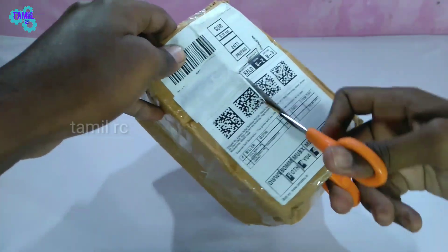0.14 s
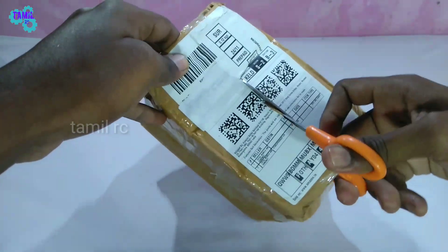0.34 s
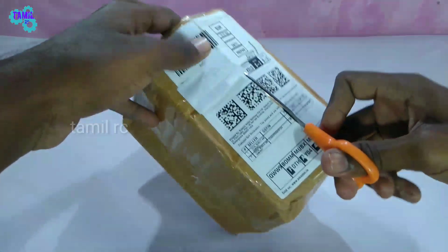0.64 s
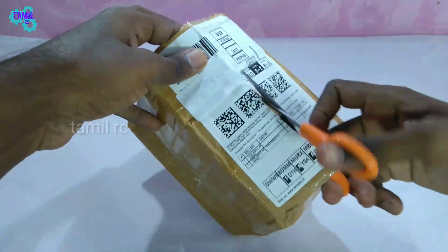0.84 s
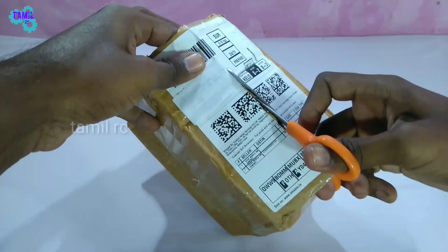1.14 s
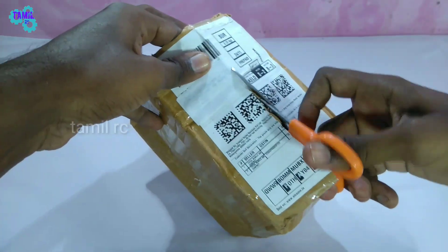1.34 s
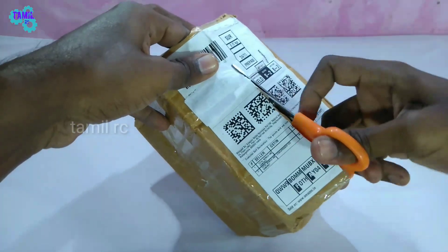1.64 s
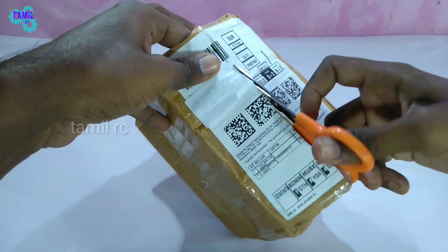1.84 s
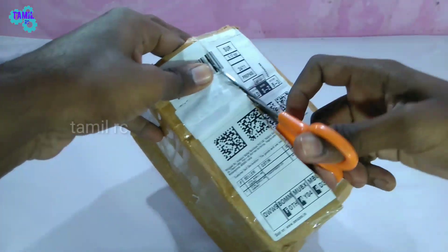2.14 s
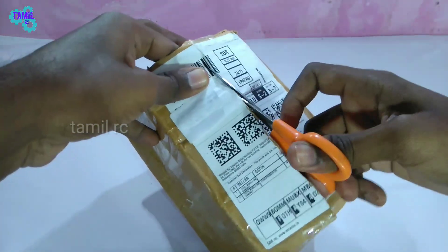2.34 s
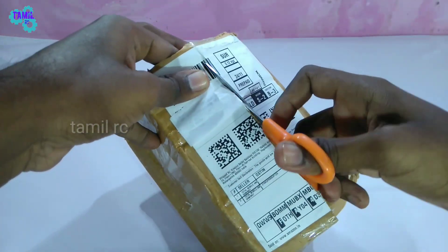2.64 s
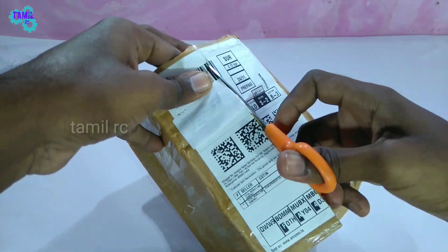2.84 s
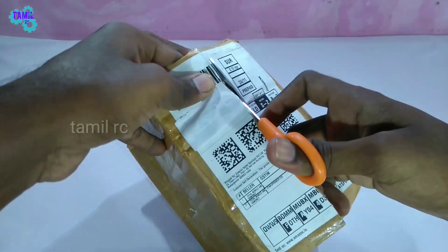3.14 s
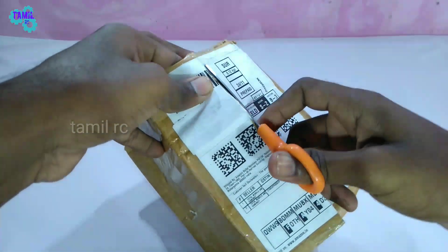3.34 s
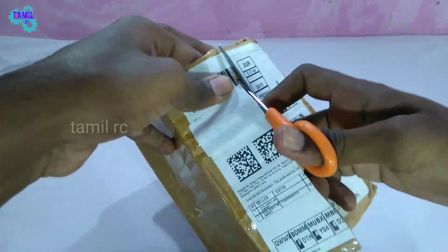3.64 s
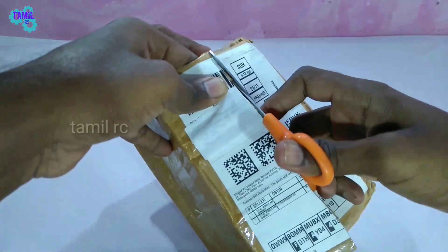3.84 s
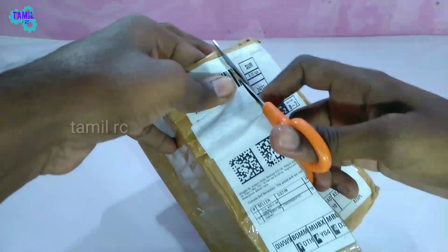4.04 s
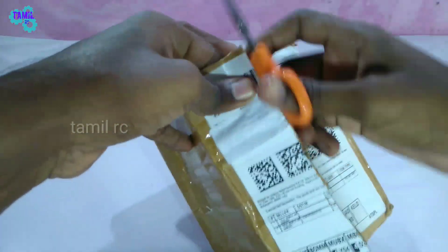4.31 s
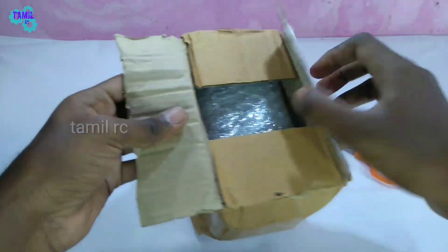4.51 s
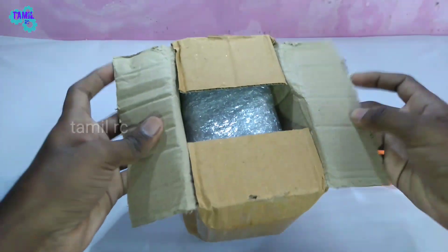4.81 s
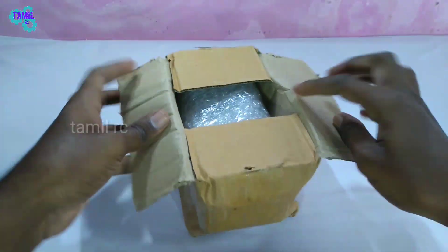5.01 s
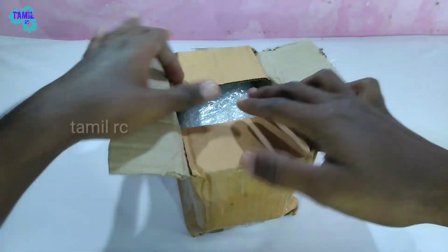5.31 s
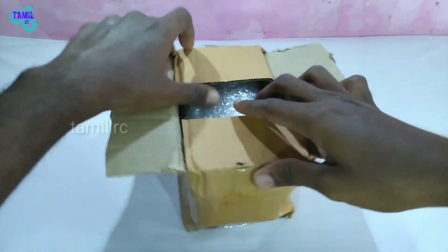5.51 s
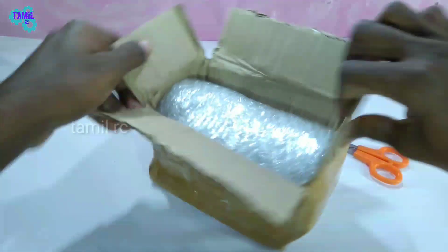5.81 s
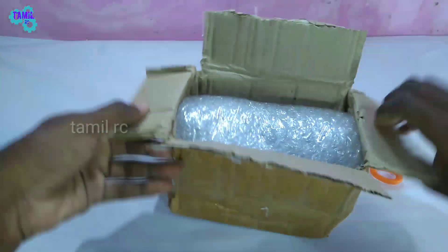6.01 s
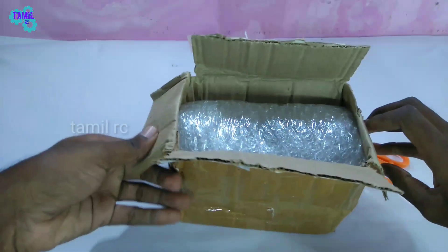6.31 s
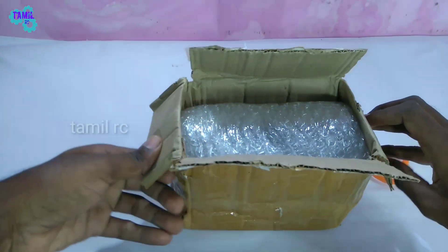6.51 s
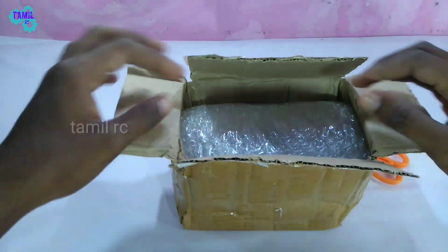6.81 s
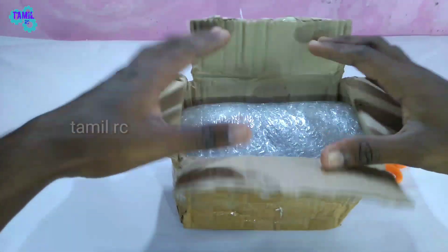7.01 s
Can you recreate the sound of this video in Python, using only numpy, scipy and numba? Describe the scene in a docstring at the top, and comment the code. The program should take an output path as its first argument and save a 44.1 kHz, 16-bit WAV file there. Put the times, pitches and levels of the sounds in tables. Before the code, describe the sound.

Close to a phone in a small room, scissors work along a taped cardboard box in short, irregular strokes. Sharp snips and tape cracks ring hollow cardboard, with near-quiet gaps between. A loud bright snap and tearing scrape end the cutting; then flaps rustle, rub and knock, with faint low handling rumble and brief motor hum.

```python
"""Small scissors snip along the taped seam of a cardboard parcel held close to a phone; then hands fold the flaps open.
Blades and fingers rub in short strokes, made of noise and uneven clicks through paper and box resonances.
Snips and tape snaps are noise bursts of a few ms that ring the hollow box.
Behind them a filtered-noise rumble and a low, slightly wavering motor tone come and go.
A small room answers as a short dull tail, and the phone's noise gate turns the quiet tails down."""
import sys
import numpy as np
from scipy import signal
from scipy.io import wavfile
from scipy.ndimage import uniform_filter1d, map_coordinates
from numba import njit

SR = 44100
rng = np.random.default_rng(int(sys.argv[2]) if len(sys.argv) > 2 else 0)


def digitize_waveform(pressure):
    """Quantize a signal to 16-bit integers and store it at the path in sys.argv[1].

    Rows of a 2-D input are taken as channels; values are limited to [-1, 1].
    """
    field = np.atleast_2d(pressure).T
    bounded = np.clip(field, -1, 1)
    quanta = np.round(bounded * 32767).astype(np.int16)
    wavfile.write(sys.argv[1], SR, quanta)


N = 315756  # length [samples]

# Low rumble behind the hands. Each row: resonance in Hz, width in Hz, level in dB.
RUMBLE_MODES = [(53.5, 16, -1.5), (73, 29.9, -1.5), (143, 46, -8.5)]
# Swells of a motor tone. Each row: start in seconds, length in seconds, first level in dB, last level in dB.
MOTOR_SWELLS = [(.945, 0.05, -55, -52.5), (3.16, 0.08, -50, -46), (3.35, 0.022, -55.5, -54),
                (6.475, 0.058, -55.5, -50), (6.78, 0.14, -62.5, -49), (7.05, .11, -60, -51.5)]
# Where the hands work before the two microphone ports.
# Each row: time in seconds, treble level left minus right in dB, left lag in samples.
HAND_PLACES = [(.2, 1.5, 3), (.7, -1, 3), (1.2, -4, 3), (1.7, -7, 4.5), (2.2, -1.5, 3.5), (2.7, -8, 6.5),
               (3.3, 2.5, 5.5), (3.7, 0, 5.5), (4.3, -0.5, 4.5), (4.7, -2.5, -1.5), (5.2, -1, 5.5),
               (5.7, -7, 5), (6.15, 0, -1.5), (6.7, 1.5, 0.15)]
# Hollow box. Each row: resonance in Hz, width in Hz, level in dB.
BOX_MODES = [(177.2, 18, -4.5), (261.1, 12, -1.5), (281.7, 14, 0.5), (326.2, 14, 1.5), (397.6, 29, 2),
             (467, 49, -6.5), (588.7, 150, -1), (678, 240, -0.5), (947, 51, -9), (1138, 110, 3),
             (1338, 883, 3), (1953, 1590, 3), (2406, 320, 3)]
# Tape and paper surface. Each row: resonance in Hz, width in Hz, level in dB.
SHEET_MODES = [(3052, 910, -3), (5023, 1400, 0), (7240, 1300, -1.5), (10200, 3000, 5.5), (14000, 4000, 0)]
# Rubbing strokes. Each row: start in seconds (before any shift onto a snap), length in seconds,
# first pressure level in dB, last pressure level in dB, box share in dB,
# grip resonance in Hz at the first level, its prominence in dB, rumble level in dB.
RUB_STROKES = [ (0, 0.02, -45.5, -58, -1.5, 676, -1.5, -50.5),
               (0.098, 0.013, -69.5, -76, -2, 400, -4, -53.5), (0.158, 0.1, -44.5, -51, 3, 593, 0, -63.5),
               (0.301, 0.018, -54.5, -69.5, 4.5, 495.5, 0, -74),
               (0.409, 0.024, -70.5, -66.5, 4.5, 460, -3, -60.5),
               (0.507, 0.025, -54, -51, -2, 390.5, 1.5, -59),
               (0.537, 0.15, -40.5, -58.5, 0, 395.3, 0.5, -59.5),
               (0.709, 0.023, -48.5, -45, -10, 420, -6, -56.5), (.787, 0.013, -67, -76, 2, 516, 6.5, -68),
               (.895, .09, -49.5, -48, 4, 414, -3, -58), (0.984, .11, -52, -51, 3, 1031, -4.5, -67),
               (1.113, 0.018, -47.5, -55, 2, 1092, -2.5, -72),
               (1.163, 0.044, -50.5, -57, -12.5, 986, -1, -64), (1.421, .1, -48, -50.5, 0, 1072, -1.5, -71),
               (1.58, .04, -69.5, -64, 0.5, 491, -2.5, -79),
               (1.635, 0.033, -52, -38.5, 0, 397.7, -1.5, -64.5),
               (1.689, 0.021, -49, -32, -2.5, 348, -5, -62),
               (1.723, .045, -59.5, -53.5, -7, 342.3, -6, -63),
               (1.87, 0.046, -76.5, -68, -0.5, 604, -5, -87), (1.929, .09, -54.5, -38, 1.5, 398.8, -7, -62),
               (2.025, 0.05, -43, -53.5, 0.5, 353.3, -4, -65), (2.179, 0.05, -54, -47, -4, 647.5, 1, -68),
               (2.272, 0.0095, -51.5, -52.5, -19, 404.7, -3.5, -77),
               (2.287, 0.034, -37, -59, 2, 331.2, -0.5, -77),
               (2.364, 0.078, -78.5, -76.5, -3, 590, -2, -96),
               (2.447, 0.067, -50.5, -50, -2, 858, -7, -68.5), (2.682, .008, -52, -61.5, -4, 341, -2, -67),
               (2.711, 0.01, -46, -59.5, -4, 345, 1, -72), (2.76, 0.08, -41.5, -54.5, 0, 402, -3.5, -60),
               (2.845, .09, -45.5, -63.5, 0.5, 395.3, -1.5, -64),
               (2.982, 0.04, -53, -44, -3.5, 589, -2, -67), (3.142, 0.14, -83, -81, 3, 411, -5.5, -58.5),
               (3.247, 0.024, -74.5, -72.5, 13, 400, -8, -55),
               (3.329, .02, -53.5, -52.5, -17, 399, -1, -65), (3.358, 0.074, -40, -62, -18.5, 400, -4, -65),
               (3.632, 0.068, -33, -44.5, -4.5, 383, 0.5, -51.5),
               (3.851, 0.029, -45.5, -50.5, 4, 350.3, -1.5, -61),
               (3.866, .08, -41, -58.5, 4.5, 350, -1.5, -62),
               (4.063, 0.039, -47, -37, -8.5, 807, -4, -59.5),
               (4.243, 0.011, -44.5, -53.5, 3, 263.4, -3, -65),
               (4.259, 0.0048, -44, -48.5, 7, 291, -2.5, -58),
               (4.271, .16, -24.5, -44.5, -13, 306.6, -5, -55.5),
               (4.447, .15, -53, -58.5, -5.5, 771, 1.5, -70.5),
               (4.623, 0.031, -61, -60.5, -1, 770.4, -2, -78),
               (4.675, 0.053, -43, -46, -18, 709, -0.5, -67),
               (4.749, .09, -50.5, -52.5, -15.5, 682, -2, -67),
               (4.87, .12, -58, -42.5, -13, 791, 6.5, -62.5),
               (5.02, .11, -34, -59.5, -17.5, 981, -1.5, -68.5), (5.16, .155, -53, -44, -16.5, 705, 0, -67),
               (5.345, 0.032, -51.5, -46.5, -15.5, 666.4, 2.5, -64),
               (5.454, .11, -41, -39, -6, 430, -1, -62), (5.579, .09, -35, -37, -8, 720, -1.5, -72),
               (5.689, .05, -36, -35, -6, 1794, -3.5, -66), (5.758, .15, -40, -44, -12, 887, -5, -61),
               (5.932, 0.16, -49, -48.5, -12.5, 448, 3, -75), (6.054, 0.095, -50, -28.5, -13, 594, 2, -67),
               (6.159, 0.061, -43, -55, -7.5, 695, -3.5, -59.5),
               (6.448, 0.079, -59, -60, -14, 701, -5, -59.5),
               (6.633, 0.0073, -70.5, -64.5, -7.5, 1202, -3, -55.5),
               (6.688, 0.013, -83.5, -77.5, 1, 686, -3, -54.5),
               (6.734, 0.03, -56.5, -53, -26, 603, -2, -61), (6.772, .155, -47, -74, -33, 500.6, -6, -58),
               (6.954, .025, -60, -59.5, -13.5, 497.7, -2.5, -58.5),
               (7.019, 0.089, -58.5, -48, -17.5, 755, 2.5, -59.5),
               (7.126, .035, -50, -49.5, -13.5, 787, 1, -54)]
# Snips, snaps and knocks. Each row: time in seconds (before the onset delay),
# crack peak in dB (before box and tape add to it), thud share in dB, tick share in dB,
# thud pitch in Hz, crack pitch in Hz.
SNAP_EVENTS = [(0.299, -35.5, -9.5, -11, 400, 926), (0.523, -51, 4.5, -9.5, 413, 1651),
               (0.542, -33, -2.5, -20.5, 390, 932), (0.545, -15, -4, -2.5, 422, 934),
               (0.608, -20, -9, -9, 414, 2270), (0.786, -52, 25, -26, 507, 703),
               (0.884, -42, -5, -14, 363, 904), (0.9, -31.5, -6, -30, 417, 1260),
               (1.113, -39.5, 11, -26.5, 692, 1320), (1.174, -41.5, -17.5, -4, 668, 703),
               (1.392, -60.5, 22.5, -23, 581, 730), (1.432, -28, 4, -23, 620, 1160),
               (1.666, -33, -24, 6.5, 700, 720), (1.703, -36, -1, -9, 298, 2156),
               (1.749, -29, -16, -20, 292, 1800), (1.902, -65.5, 6, 20, 477, 703),
               (1.929, -41, -13, 11.5, 320, 2196), (1.976, -19.5, -18, -39, 396, 1040),
               (2.005, -29, 1, -14, 237, 3055), (2.029, -30, -3, 6, 170, 1160),
               (2.179, -50, 15.5, -8.5, 895, 1663), (2.2, -36.5, 6, -4, 616, 1294),
               (2.271, -60, -13, -1, 562, 2480), (2.285, -25, -11.5, -15, 317, 1990),
               (2.682, -52, -9, 13.5, 412, 1390), (2.715, -48, -3, 8.5, 290, 1308),
               (2.762, -12, -21.5, 1.5, 899, 1166), (2.765, -20.5, -11.5, -11, 300, 940),
               (2.784, -16, -11.5, -34.5, 405, 1050), (2.845, -10.5, -22.5, -3.5, 283, 1013),
               (2.921, -54.5, -7, 18.5, 328, 4030), (2.996, -44.5, 10, -7, 423, 746),
               (3.334, -57, -5, 18.5, 167, 4410), (3.356, -43.5, -2.5, 28, 151, 4480),
               (3.63, -29, -7.5, 15.5, 396, 720), (3.847, -30, -9, -7, 242, 813),
               (3.87, -33.5, 4, -28, 352, 707), (3.88, -11.5, -18, -51, 287, 1590),
               (3.892, -24, -21, 3, 283, 703), (4.069, -37, -17.5, -2.5, 276, 1240),
               (4.243, -21.5, -13.5, -15, 277, 705), (4.259, -19.5, -15, 1, 294, 703),
               (4.268, -11, -15, 10, 256, 2550), (4.425, -47, -24, 19.5, 300, 4400),
               (4.818, -45.5, 9, -5, 630, 700), (4.935, -39.5, 12.5, -13, 920, 934),
               (4.974, -38, -13, -13, 390, 1120), (5.026, -27.5, -28, -1, 766, 3830),
               (5.309, -33.5, -1, -17, 641, 2720), (5.462, -51, 10, 1.5, 460, 754),
               (5.477, -23, -14, 3.5, 404, 1130), (5.546, -30.5, 3, -13, 590, 703),
               (5.609, -22, -11, -1, 624, 1690), (5.708, -21.5, -25, -5, 900, 2140),
               (5.723, -24, -1, -2, 655, 1740), (5.936, -23.5, -28, -34.5, 684, 4180),
               (6.115, -36, 15, 15.5, 853, 833), (6.151, -20.5, 6, 6, 732, 715),
               (6.462, -38.5, -28.5, -16, 171.4, 4220), (6.484, -40, -21, -19.5, 146.4, 4330),
               (6.776, -55.5, -21, 21, 168, 4350), (7.068, -45, -20, -20.5, 148, 900)]

MOTOR_HZ = 105.8
MOTOR_RISE_DB_S, MOTOR_FALL_DB_S = 600, 702
RUMBLE_RISE_DB_S, RUMBLE_FALL_DB_S = 1200, 800
ROOM_T60_S, ROOM_DB, ROOM_DULL_HZ = 0.12, -10, 8600
STROKE_RISE_DB_S, STROKE_FALL_DB_S = 1795.5, 780.5  # how fast a stroke sets in and dies away
TAIL_DB, TAIL_DB_S = -26, 301  # each stroke leaves a faint rubbing tail, which fades at this slower rate
JOLT_RISE_DB_S, JOLT_NEAR_S = 5000, .005  # a stroke that starts this near a snap sets in at once
GRIP_GLIDE = 0.016  # the grip resonance climbs by this share for each dB that a stroke gains
ONSET_DELAY_S = .0013  # each burst starts this long after its row time
GATE_DB, GATE_RATIO, GATE_S, GATE_DEPTH_DB = -53.5, 2.02, 0.0013, 7.5
TOP_HZ = 15500  # upper limit of the microphone chain


def undb(db):
    """Decibels to gain."""
    return 10 ** (np.asarray(db) / 20)


def unit(x):
    """Scale to rms 1."""
    return x / np.sqrt(np.mean(x ** 2))


def ring(x, modes):
    """Sum of resonances, neighbours in opposite sign."""
    total = 0
    for k, (hz, width, db) in enumerate(modes):
        peak = signal.iirpeak(hz, hz / width, SR)
        total = total + (-1) ** k * undb(db) * signal.lfilter(*peak, x)
    return total


def curve(rows):
    """Columns of a table, after its first column of times, as sample-rate curves."""
    s, *columns = np.transpose(rows)
    return [np.interp(np.arange(N) / SR, s, c) for c in columns]


def walk(rate):
    """Random levels, rate per second, joined by slopes; spread a little under 1."""
    k = int(SR / rate)
    levels = rng.standard_normal(N // k + 1)
    return uniform_filter1d(np.repeat(levels, k), k)[:N]


def pair(make, alike):
    """A spread source: both ports share part of it and each hears some of its own."""
    alike = np.clip(alike, 0, 1)
    return np.sqrt(alike) * make() + np.sqrt(1 - alike) * np.array([make(), make()])


def swells(rows, rise_db_s, fall_db_s):
    """Power of each row over time, one value a millisecond: rise, glide from first to last level, fall."""
    t = np.arange(0, N / SR + .002, .001)
    start, length, first_db, last_db = np.transpose(rows)[:, :, None]
    db = first_db + (last_db - first_db) * np.clip((t - start) / length, 0, 1)
    db = db - rise_db_s * np.clip(start - t, 0, None)
    db = db - fall_db_s * np.clip(t - start - length, 0, None)
    return undb(2 * db) + 1e-30


def stretch(values):
    """One value a millisecond to one a sample."""
    return np.interp(np.arange(N) / SR * 1000, np.arange(len(values)), values)


def total_db(power):
    """Summed level of overlapping swells."""
    return stretch(10 * np.log10(power.sum(axis=0)))


def hum():
    """Bass noise that comes with each stroke, and a motor sine whose pitch wavers by a few Hz."""
    rumble_rows = np.array(RUB_STROKES)[:, [0, 1, 7, 7]]
    rumble_db = total_db(swells(rumble_rows, RUMBLE_RISE_DB_S, RUMBLE_FALL_DB_S))
    motor_db = total_db(swells(MOTOR_SWELLS, MOTOR_RISE_DB_S, MOTOR_FALL_DB_S))
    phase = 2 * np.pi * np.cumsum(MOTOR_HZ + 3.6 * walk(13)) / SR
    motor = np.sqrt(2) * np.sin(phase) * undb(motor_db)
    rumble = unit(pair(lambda: ring(rng.standard_normal(N), RUMBLE_MODES), 0.85))
    return rumble * undb(rumble_db) + motor


def room(x):
    """A small room's diffuse tail: decaying noise, dulled, with the treble different at each port."""
    t = np.arange(SR // 2) / SR
    decay = 1000 ** (-t / ROOM_T60_S) * np.minimum(t / 0.0023, 1)
    tail = rng.standard_normal((2, len(t))) * decay
    tail = signal.lfilter(*signal.butter(1, ROOM_DULL_HZ, fs=SR), tail)
    # long waves reach both ports alike
    bass = signal.lfilter(*signal.butter(1, 1200, fs=SR), tail[0] - tail[1])
    tail[1] += bass
    tail = tail / np.sqrt(np.sum(tail[0] ** 2))
    return undb(ROOM_DB) * signal.fftconvolve(x[None], tail, axes=1)[:, :N]


def slips(per_s, spread_db, smooth):
    """Stick-slip: sparse clicks of very uneven size over a smooth rub."""
    happens = rng.random(N) < per_s / SR
    sizes = undb(spread_db * rng.exponential(size=N))
    clicks = happens * sizes * rng.standard_normal(N)
    return unit(clicks) + smooth * rng.standard_normal(N)


@njit
def sweep(x, hz, damping):
    """State-variable band-pass whose centre moves."""
    y, band, low = np.empty(len(x)), 0., 0.
    for i in range(len(x)):
        g = np.tan(np.pi * hz[i] / SR)
        v = (band + g * (x[i] - low)) / (1 + g * (g + damping))
        band, low, y[i] = 2 * v - band, low + 2 * g * v, damping * v
    return y


def rubbing(pan):
    """The surface rustles and the same uneven pressure drives the box walls."""
    rows = np.array(RUB_STROKES)
    # strokes that start close to a snap move to the onset of its burst
    gap = np.array(SNAP_EVENTS)[:, 0] - rows[:, :1]
    jolt = np.abs(gap).min(axis=1) < JOLT_NEAR_S
    rows[jolt, 0] += gap[jolt, np.abs(gap[jolt]).argmin(axis=1)] + ONSET_DELAY_S
    rise_db_s = np.where(jolt, JOLT_RISE_DB_S, STROKE_RISE_DB_S)[:, None]
    power = swells(rows[:, :4], rise_db_s, STROKE_FALL_DB_S)
    ends = rows[:, 0] + rows[:, 1]
    tail = np.column_stack([ends, np.full(len(rows), .01), rows[:, [3, 3]] + TAIL_DB])
    power = power + swells(tail, STROKE_RISE_DB_S, TAIL_DB_S)
    # the strongest stroke of the moment weighs most in box share and grip
    settings = rows[:, [2, 4, 5, 6]].T @ power / power.sum(axis=0)
    first_db, box_db, grip_hz, grip_db = map(stretch, settings)
    gained_db = np.clip(total_db(power) - first_db, 0, 20)
    grip_hz = grip_hz * (1 + GRIP_GLIDE * gained_db)
    # tape that has sprung free slides more evenly
    after_jolt = stretch(jolt @ power / power.sum(axis=0))
    pressure_db = total_db(power) + (3.2 - 1.6 * after_jolt) * walk(60)
    # each patch of surface under the fingers has its own colour
    patches = [undb(3.5 * walk(14)) for _ in SHEET_MODES]

    def surface():
        """Stick-slip through each sheet resonance, whose level wanders."""
        return sum(g * ring(slips(3000, 2.42, 0.15), [m]) for g, m in zip(patches, SHEET_MODES))

    def walls():
        """Box modes, with those near the grip's resonance standing out."""
        box = ring(slips(900, 2.6, .9), BOX_MODES)
        held = sweep(box, grip_hz, .35)
        held_even = held / uniform_filter1d(np.abs(held), 4096)
        return undb(grip_db) * held_even + .6 * unit(box)
    sheet = unit(pair(surface, 0.21)) * pan
    box = unit(pair(walls, 0.64)) * undb(box_db + 3.7 * walk(40))
    return undb(pressure_db) * (sheet + box)


def snaps(pan):
    """Each snap is a ragged burst of a few ms: a tick, a crack, and a thud in the box modes near its pitch."""
    t = np.arange(4096) / SR
    tick, crack, thud = np.zeros((3, N + len(t)))
    chance = rng.standard_normal((len(SNAP_EVENTS), len(t)))
    chance[:, 0] = 4.5  # the break itself is one sharp step
    hz, width, db = np.transpose(BOX_MODES)[:, :, None]
    fade = np.exp(-1.9 * np.pi * width * t)  # dies faster than the mode widths alone would give
    modes = undb(db) * np.sin(2 * np.pi * hz * t) * fade * np.minimum(t / 0.0016, 1)
    for (s, peak_db, thud_db, tick_db, thud_hz, crack_hz), noise in zip(SNAP_EVENTS, chance):
        start = int((s + ONSET_DELAY_S) * SR)
        at = slice(start, start + len(t))
        burst = ring(noise * np.exp(-t / .0015), [(crack_hz, 1.2 * crack_hz, 0)])
        crack[at] += undb(peak_db) * burst / np.abs(burst).max()
        tick[at] += undb(peak_db + tick_db) * noise * np.exp(-t / 0.0024)
        nearness = np.exp(-(np.log(hz[:, 0] / thud_hz) / 0.15) ** 2)
        thud[at] += undb(peak_db + thud_db) * nearness @ modes
    # the crack also rings the upper box modes, and the taut tape brightens it
    boxed = undb(4.5) * ring(crack, BOX_MODES[8:])
    taped = undb(5) * ring(crack, SHEET_MODES[:2])
    low = (thud + crack + boxed + taped)[:N]
    high = undb(-7) * ring(tick, SHEET_MODES)[:N]
    return low + pan * high


def scene():
    """Hands, box, room and hum at two ports; only sheet rustle and ticks show direction in level."""
    pan_db, lag = curve(HAND_PLACES)
    pan = undb(np.array([pan_db, -pan_db]) / 2)
    left, right = rubbing(pan) + snaps(pan)
    late = map_coordinates(left, [np.arange(N) - lag], order=3, mode="nearest")
    return np.array([late, right]) + room(right) + hum()


def record(dry):
    """Treble peaks at the left port and dips at the right; a gate lowers quiet sound; peaks round off; top is cut."""
    x = dry + np.array([[.8], [-.45]]) * ring(dry, [(10015, 4600, 0.0013)])
    # the gate follows the power of both ports, averaged twice over its window
    k = int(GATE_S * SR)
    power = uniform_filter1d(uniform_filter1d(np.mean(x ** 2, axis=0), k), k)
    loud_db = 10 * np.log10(power.clip(1e-14))
    x = x * undb(np.clip((loud_db - GATE_DB) * (GATE_RATIO - 1), -GATE_DEPTH_DB, 0))
    x = np.tanh(1.15 * x) / 1.15
    return signal.sosfilt(signal.ellip(10, .2, 80, TOP_HZ, fs=SR, output="sos"), x)


dry = scene()
out = record(dry)
digitize_waveform(out)
```